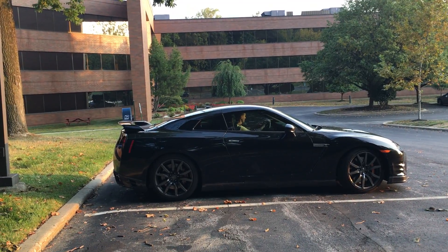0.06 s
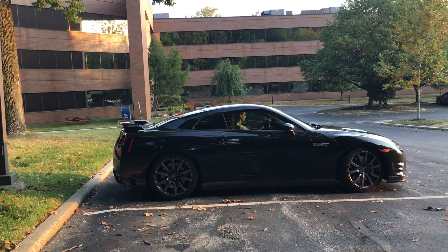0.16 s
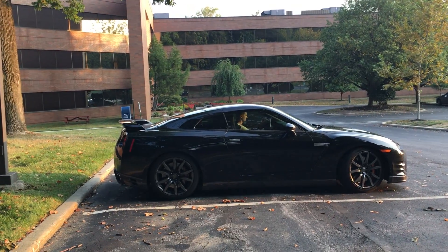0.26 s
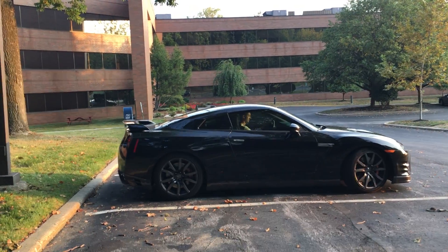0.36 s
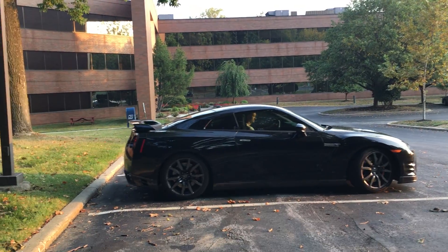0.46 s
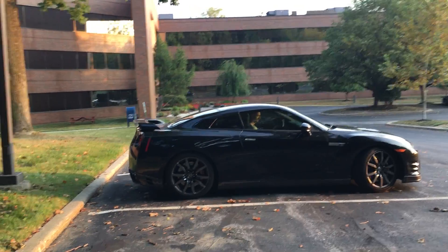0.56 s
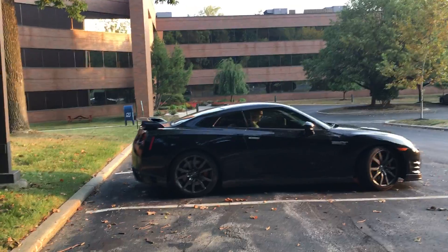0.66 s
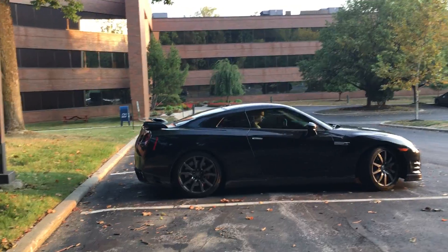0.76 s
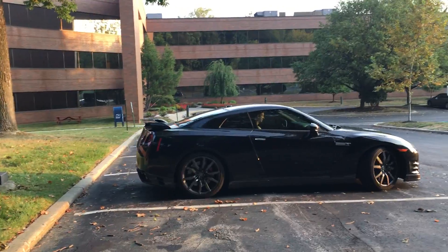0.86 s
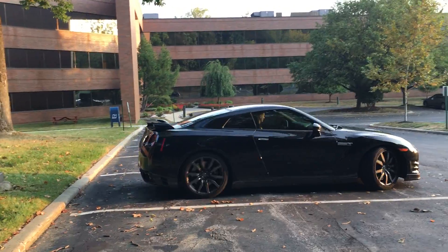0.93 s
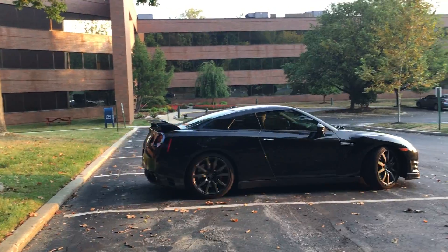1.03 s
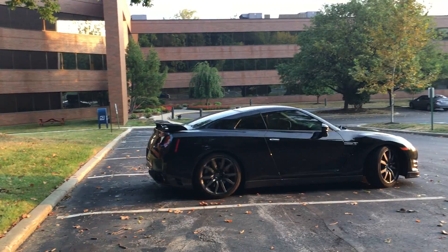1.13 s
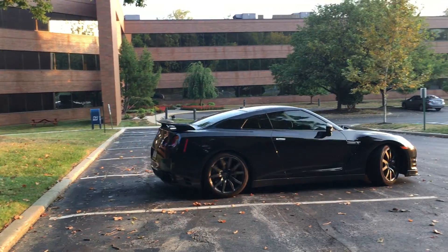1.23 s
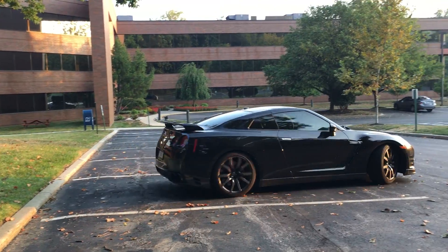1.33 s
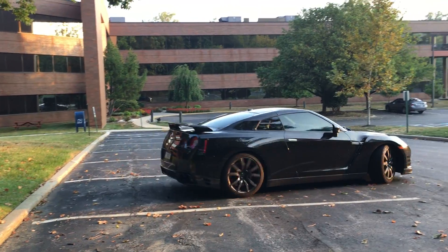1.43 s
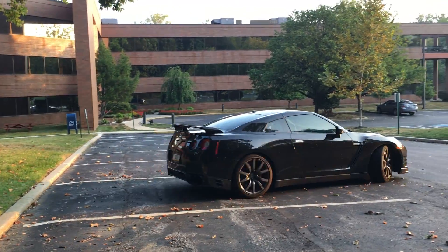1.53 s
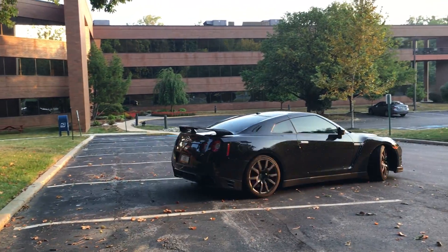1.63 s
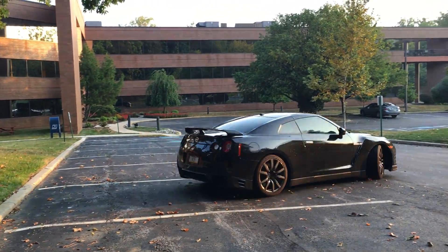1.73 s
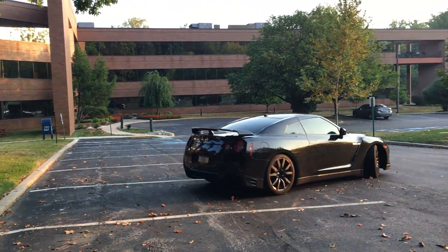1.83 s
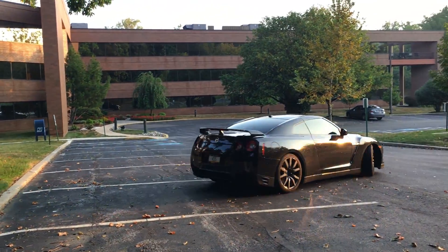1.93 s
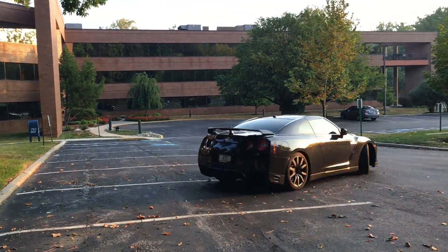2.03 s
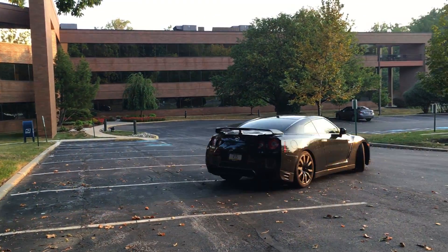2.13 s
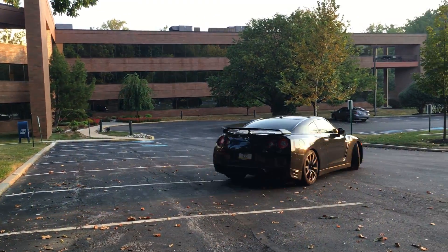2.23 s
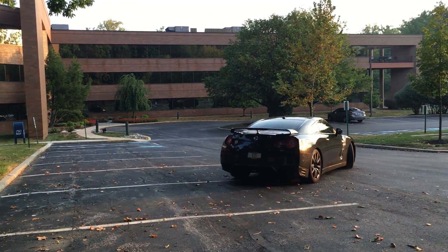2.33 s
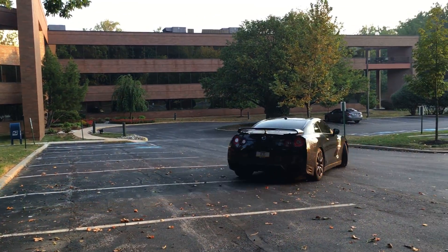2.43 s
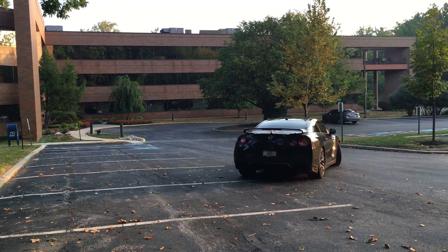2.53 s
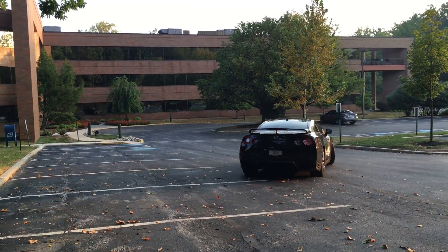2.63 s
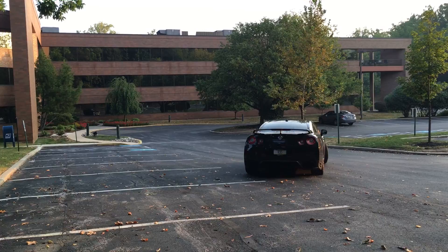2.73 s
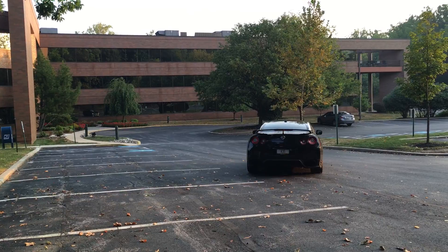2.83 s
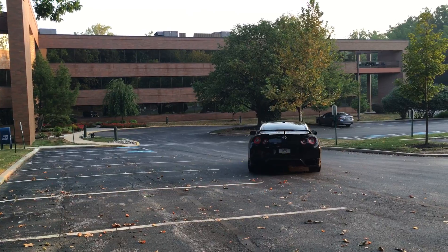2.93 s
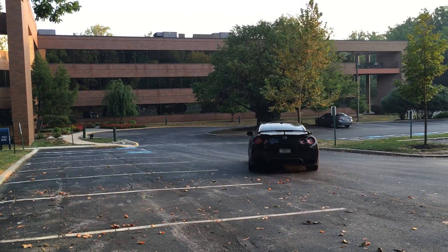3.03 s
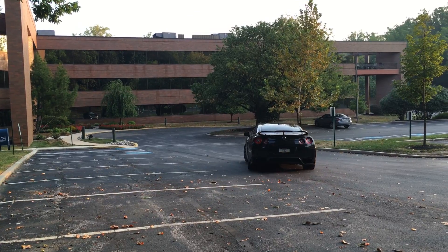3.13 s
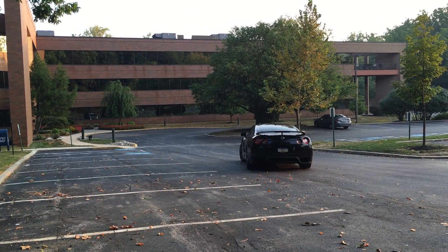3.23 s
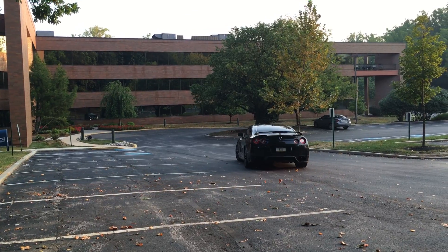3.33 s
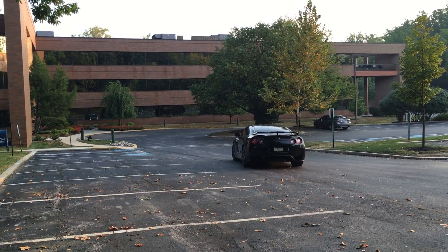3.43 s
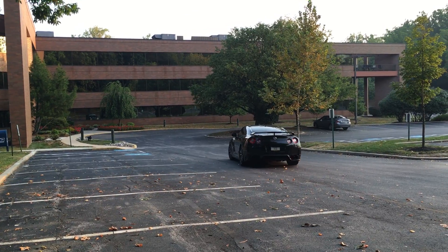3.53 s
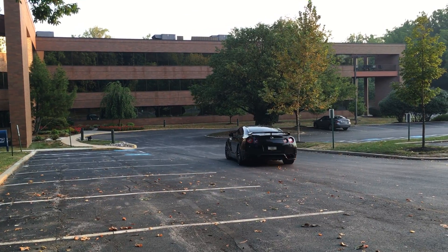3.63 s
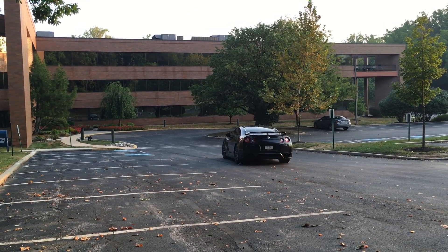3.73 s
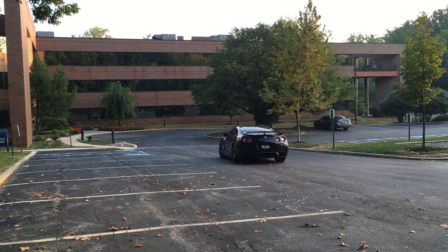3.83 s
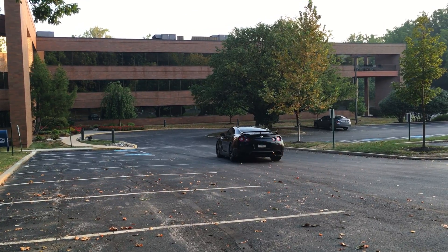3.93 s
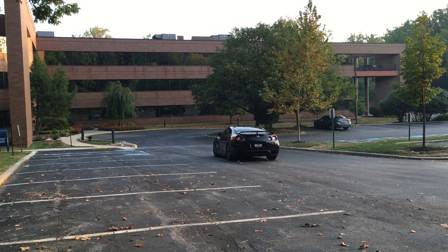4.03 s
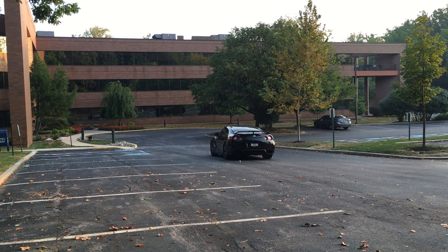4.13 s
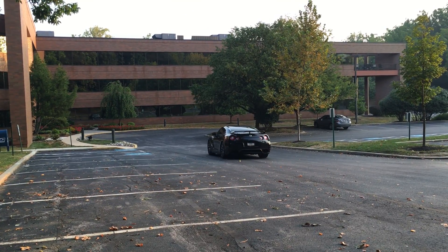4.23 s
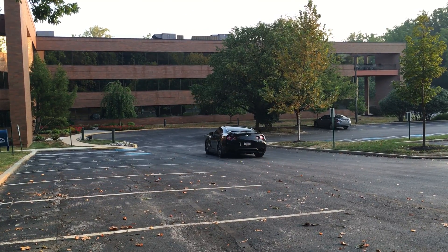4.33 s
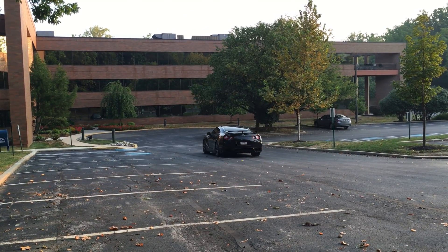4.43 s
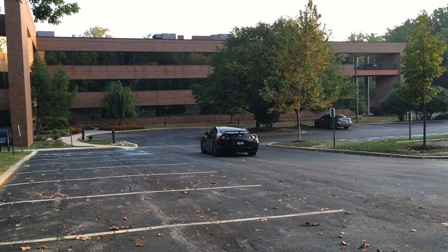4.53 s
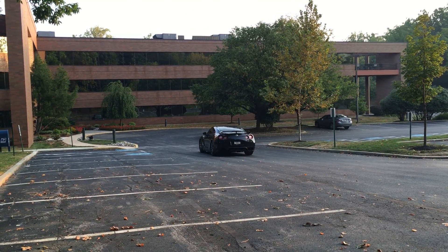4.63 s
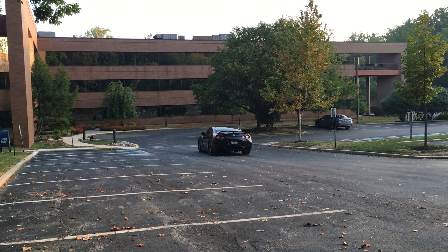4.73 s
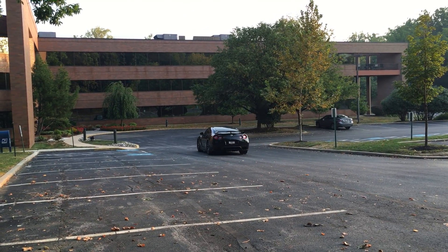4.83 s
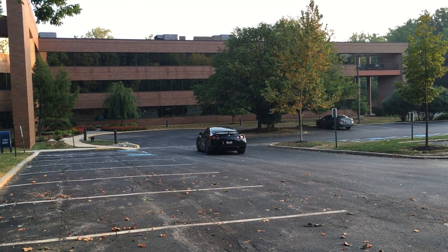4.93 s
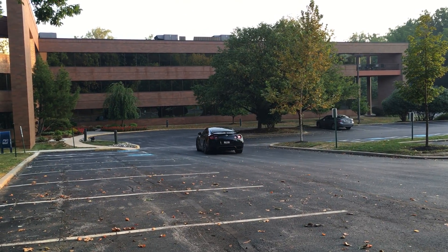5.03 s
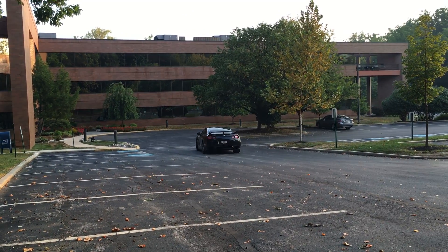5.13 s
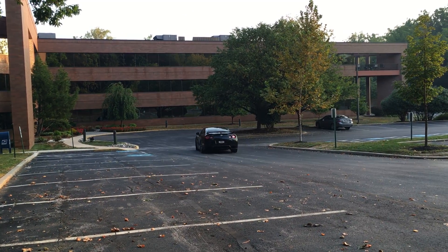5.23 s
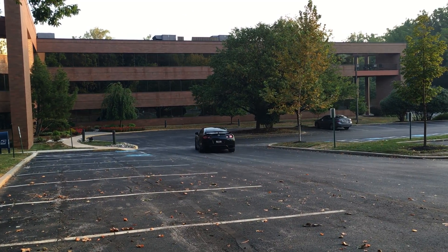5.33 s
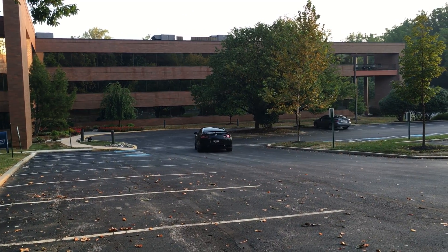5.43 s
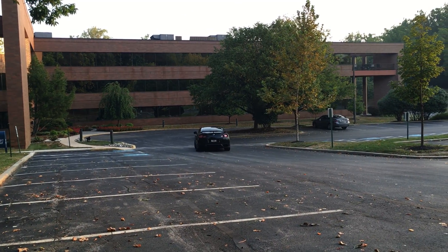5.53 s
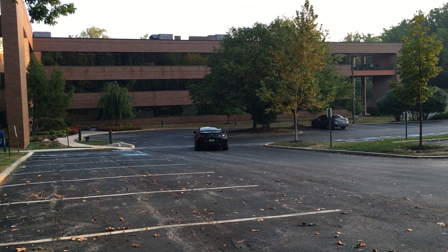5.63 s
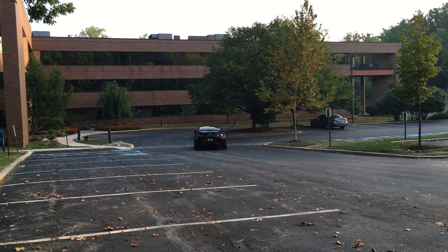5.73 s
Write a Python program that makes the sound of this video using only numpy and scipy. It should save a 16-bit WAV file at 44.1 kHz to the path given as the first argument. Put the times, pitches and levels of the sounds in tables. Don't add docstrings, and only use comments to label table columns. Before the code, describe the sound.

Low exhaust growl rises smoothly as a sports car turns and drives off over dry leaves, ending with soft pops amid evening insects.

```python
import sys
import numpy as np
from scipy import signal
from scipy.fft import rfft, irfft, next_fast_len
from scipy.io import wavfile
from scipy.ndimage import uniform_filter1d

SR = 44100
rng = np.random.default_rng(int(sys.argv[2]) if len(sys.argv) > 2 else 0)


def waveform_to_disk(signal):
    frames = np.transpose(np.atleast_2d(signal))
    scaled = np.clip(frames, -1, 1) * 32767
    samples = np.round(scaled).astype(np.int16)
    wavfile.write(sys.argv[1], SR, samples)


def gain_from_db(level_db):
    decades = np.asarray(level_db, float) / 20
    return 10 ** decades


N = 254456

CYLINDER_LEVELS = [0, -8, -6, -9, -16, -.5]
# time_s, share (0-1)
FLOW_SHARE = [(0, .4), (.4, .5), (1.9, .5), (2.15, .12), (3.5, .1), (3.8, .18), (4.7, .2), (5, .6),
              (5.3, .5), (5.4, .15), (5.77, .15)]
# frequency_hz, density_db (per Hz)
TYRE_SPECTRUM = [(3000, -26), (5000, -25), (8000, -2), (9800, -2.5), (10500, -8), (11800, -4.5),
                 (14000, -11.5), (16000, -10.5)]


def rms_one(x):
    return x / np.sqrt(np.mean(x ** 2) + 1e-20)


def in_time(rows):
    time_s, *columns = np.transpose(rows)
    return [np.interp(np.arange(N) / SR, time_s, column) for column in columns]


def drift(rate_hz):
    pole = np.exp(-2 * np.pi * rate_hz * 40 / SR)
    white = rng.standard_normal(N // 40 + 2002)
    slow = signal.lfilter([1], [1, -2 * pole, pole * pole], white)[2000:]
    return np.interp(np.arange(N) / 40, np.arange(len(slow)), rms_one(slow))


def resonate(x, modes):
    out = 0
    for k, (hz, width_hz, level_db) in enumerate(modes):
        r = np.exp(-np.pi * width_hz / SR)
        b = (1 - r * r) / 2 * np.array([1, 0, -1])
        a = [1, -2 * r * np.cos(2 * np.pi * hz / SR), r * r]
        out = out + (-1) ** k * gain_from_db(level_db) * signal.lfilter(b, a, x + 1e-18)
    return out


def coloured(spectrum):
    size = next_fast_len(N)
    hz, level_db = np.transpose(spectrum)
    bins_hz = np.arange(size // 2 + 1) * SR / size
    gain = gain_from_db(np.interp(np.log(bins_hz + 1), np.log(hz), level_db, -90, -90))
    return rms_one(irfft(rfft(rng.standard_normal(size)) * gain, size)[:N])


def evening():
    # frequency_hz, density_db (per Hz)
    air = [(180, -6), (300, -5), (404, -17.5), (674, -11.5), (744, -20.5), (2040, -14.5), (2210, -18.5),
           (3020, -28.5), (3400, -29.5), (4800, -36.5), (5760, -26.5), (6790, -32.5), (7620, -40),
           (11500, -50), (15500, -59)]
    # frequency_hz, width_hz, level_db
    low_chorus = [(1111, 180, 4.5), (1798, 53, 7), (2155, 44, 10), (2347, 100, 4), (3370, 112, -4)]
    # frequency_hz, width_hz, level_db
    high_chorus = [(5330, 280, -8.5), (5820, 360, -2), (6740, 240, 0), (6686, 130, -8), (7004, 64, -1.5)]
    low = rms_one(resonate(rng.standard_normal(N), low_chorus)) * gain_from_db(-52 + 0.5 * drift(7.6))
    high = resonate(resonate(rng.standard_normal(N), high_chorus), [(6480, 2800, 0)])
    settling_db = 6 * np.exp(-np.arange(N) / SR / 0.39)
    high = rms_one(high) * gain_from_db(-61 + 1.1 * drift(5) + settling_db)
    return gain_from_db(-46) * coloured(air) + low + high


def engine_bay():
    # frequency_hz, width_hz, level_db
    pulleys = [(1160, 35, -2), (1801, 51, -1.5)]
    turn_away_s = 1.4
    whistle = rms_one(resonate(resonate(rng.standard_normal(N), pulleys), pulleys))
    return whistle * gain_from_db(-54 + 3.4 * drift(14)) * np.exp(-np.arange(N) / SR / turn_away_s)


def steering_pump():
    # start_s, level_db, length_s
    wheezes = [(.25, -61, .4), (.735, -50, .06), (.81, -47, .09), (.92, -44, .06), (1, -46, .13),
               (1.15, -53, .16), (1.33, -49, .16), (1.5, -49, .34), (1.75, -55, .35)]
    level = np.zeros(N)
    for start_s, level_db, length_s in wheezes:
        length = round(length_s * SR)
        level[round(start_s * SR):][:length] += gain_from_db(level_db) * np.hanning(length)
    band = rms_one(resonate(rng.standard_normal(N), [(2150, 61, 0.02), (2300, 59, 0)]))
    return level * gain_from_db(-1.5 + 0.79 * drift(9.2)) * band


def clutch():
    # start_s, level_db, pitch_hz
    chirps = [(.168, -35, 690), (.17, -41, 1140), (0.206, -42, 1790), (.208, -51, 3320), (0.209, -60, 4000),
              (.245, -41, 1095), (0.275, -52, 3930), (.279, -60, 4270), (.36, -47, 2086), (.375, -50, 2150),
              (.28, -48, 1150), (.282, -35.5, 602), (0.302, -37, 1627), (.325, -47, 650), (.375, -50, 670)]
    out = np.zeros(N)
    t = np.arange(round(0.02 * SR)) / SR
    for start_s, level_db, hz in chirps:
        chirp = np.hanning(len(t)) * np.sin(2 * np.pi * hz * t * (1 + 0.24 * t))
        out[round(start_s * SR):][:len(t)] += gain_from_db(level_db) * chirp
    roughness = signal.lfilter([.02], [1, -1.9, .9025], rng.standard_normal(N))
    return out * (1 + .6 * roughness)


def dry_leaves(tyre_db):
    # start_s, peak_db, top_db (level above the crossover)
    snaps = [(1.3867, -52, -13), (1.6294, -48, -23), (1.6444, -48, -14), (1.7694, -55, -9),
             (1.9594, -55, -20), (2.1924, -45, -22), (2.4994, -49, -17), (2.7694, -53, -18),
             (3.0954, -56, -17), (3.2345, -54, -20), (3.3353, -55, -14), (3.4511, -50, -15),
             (3.5216, -49, -27), (3.7294, -51, -20), (4.0567, -52, -24)]
    decay_s, cracks_per_s, crossover_hz = 0.0045, 120, 10500
    out, crisp = 0, coloured(TYRE_SPECTRUM)
    for side, top_share in (("low", 0), ("high", 1)):
        crack_db = -72 + 3.5 * np.minimum(rng.exponential(1, N), 2)
        clicks = (rng.random(N) < cracks_per_s / SR) * gain_from_db(crack_db + tyre_db + 63.5)
        for start_s, peak_db, top_db in snaps:
            clicks[round(start_s * SR)] += gain_from_db(peak_db - 8 + top_share * (top_db + 12))
        burst = signal.lfilter([1], [1, -np.exp(-1 / (decay_s * SR))], clicks + 1e-18)
        band = signal.butter(4, crossover_hz, side, fs=SR, output="sos")
        out = out + burst * signal.sosfilt(band, crisp)
    return out


def tyre_hiss(tyre_db):
    return gain_from_db(tyre_db + 0.54 * drift(9)) * coloured(TYRE_SPECTRUM)


def body_hiss(idle, far_db):
    # frequency_hz, density_db (per Hz)
    body = [(700, 5), (1130, 4.5), (1400, 5), (1800, 3), (2200, -18), (2600, -4), (3400, -9.5),
            (4200, -13.5), (5500, -19)]
    body_db = -50 - 9 * idle + 0.56 * far_db
    return gain_from_db(body_db + 2.1 * drift(24)) * coloured(body)


def gear_whine(firing, throttle_db, coast, engaged):
    level_db = -57.5 + .5 * throttle_db - 11 * coast + drift(3)
    return engaged * np.sqrt(2) * gain_from_db(level_db) * np.cos(2 * np.pi * 17 * firing)


def exhaust_flow(idle, far_db, lift):
    # frequency_hz, density_db (per Hz)
    turbulence = [(25, -30), (45, -1.5), (65, 3), (120, 2.5), (200, -6.5), (280, -3.5), (350, -10),
                  (420, -18), (900, -19.5)]
    flow_db = -31 - 18 * idle + .7 * far_db + 3.5 * lift
    return gain_from_db(flow_db - 3 + drift(12)) * coloured(turbulence)


def fuel_burbles():
    # start_s, peak_db, brightness_db
    pops = [(5.043, -23, -22), (5.056, -25, -10), (5.087, -19, -20), (5.114, -21, -24), (5.134, -21, -22),
            (5.211, -19, -13), (5.25, -22, -20), (5.276, -24, -12), (5.466, -25, -16), (5.59, -27, -14),
            (5.654, -28, -14)]
    # frequency_hz, width_hz, level_db
    low_modes = [(62, 35, 3), (110, 70, 2), (175, 70, -6), (265, 60, -6)]
    start_s, peak_db, bright_db = np.transpose(pops)
    low, high = np.zeros((2, N))
    at = (start_s * SR).astype(int)
    low[at] = gain_from_db(peak_db + 41)
    high[at] = gain_from_db(peak_db + bright_db + 49)
    soft = signal.butter(2, 700, fs=SR, output="sos")
    return signal.sosfilt(soft, resonate(low, low_modes) + resonate(high, [(456, 14, 0)]))


def crank_rumble(firing, idle, far_db, lift):
    level_db = -46 - 14 * idle - .3 * far_db + 8.7 * lift
    return gain_from_db(level_db) * np.cos(np.pi * firing + 2.3 * drift(3.5))


def pipe_levels(speed, facing_db, slack_db, engaged):
    # frequency_hz, mean_db, swing_db, share of the facing gain (0-1)
    tuning = [(481.6, -38.5, 4, 1), (580.4, -44, 8.5, 0.67), (675.6, -41, 6, 0.51)]
    pulsed = np.clip(1.3 - 2 * in_time(FLOW_SHARE)[0], 0, 1)
    clean = np.clip(3.5 * engaged, 0, 1.25) * pulsed * np.clip(1 + facing_db / 18, 0, 1)
    levels = []
    for hz, mean_db, swing_db, share in tuning:
        swell_db = swing_db * clean * np.cos(2 * np.pi * hz / speed)
        levels.append(mean_db + slack_db + share * facing_db + swell_db)
    return levels


def rasp(firing, levels_db):
    lateness = [0, .14, .26, .22, .19, .04]
    # frequency_hz, width_hz, level_db
    pipes = [
        [(503, 81, 0)],
        [(591.8, 104, 0)],
        [(670, 37, 5.5), (759, 20, 0)],
    ]
    # frequency_hz, width_hz, level_db
    silencer = [(238.2, 16.6, 3), (315, 79, -26)]
    count = np.arange(np.ceil(firing[0]), firing[-1] - 1).astype(int)
    cylinder = count % 6
    at = np.searchsorted(firing, count + np.array(lateness)[cylinder])
    pulses = np.zeros(N)
    pulses[at] = gain_from_db(np.array(CYLINDER_LEVELS)[cylinder] + .8 * rng.standard_normal(len(count)))
    pulses = pulses + gain_from_db(-13) * np.roll(pulses, round(.0045 * SR))
    noisy, = in_time(FLOW_SHARE)
    drive = np.sqrt(1 - noisy ** 2) * rms_one(pulses) + noisy * rng.standard_normal(N)
    drive = signal.sosfilt(signal.butter(4, 880, fs=SR, output="sos"), drive)
    out = 0
    for modes, level_db in zip([*pipes, silencer], levels_db):
        first_hz, last_hz = modes[0][0], modes[-1][0]
        rung = resonate(resonate(drive, modes), [(first_hz, 130 + 1.5 * (last_hz - first_hz), 0)])
        rung = np.roll(rung, round((first_hz - 600) * SR / 80000))
        out = out + gain_from_db(level_db - 2.5) * rung / np.sqrt(uniform_filter1d(rung ** 2, SR // 4))
    return out


def order_levels(speed, throttle_db, facing_db, far_db, idle):
    # frequency_hz, width_hz, level_db
    resonances = [(62.2, 26, 3.5), (78.5, 29.6, 5.5), (165, 25, -8.5), (171.5, 64.3, -8.5),
                  (233.2, 22.6, -11), (258, 28, -11.5), (277.7, 28, -7), (321, 28, -21.5),
                  (388.4, 18.6, -26.5), (475, 13, -26), (604, 50, -24)]
    # level_db (at even throttle), share of the facing gain, idle_db (added at idle)
    orders = [(-18, -0.13, -8), (-12.5, .48, -3.5), (-10.5, 0.64, 11), (-14, -0.021, -1.5), (-13, 1, 27.5),
              (-19.5, 0.88, 1)]
    levels = []
    for k, (level_db, share, idle_db) in enumerate(orders):
        power = 0
        for hz, width_hz, db in resonances:
            detuning = 2 * ((k + 1) * speed - hz) / width_hz
            power = power + gain_from_db(db) ** 2 / (1 + detuning ** 2) ** 2
        wobble_db = 1.2 * min(k, 1) * drift(4.1)
        settings_db = throttle_db + share * facing_db + idle_db * idle + far_db
        levels.append(level_db + 10 * np.log10(power) + settings_db + wobble_db)
    return levels


def exhaust_note(firing, order_db, bank_db, lope):
    lags = [0, .12, .12, .03, 0, 0]
    # multiple of the firing rate, level_db
    half_orders = [(1.5, 0), (2.5, -5), (3.5, -8), (4.5, -14)]
    whole = np.arange(-600, 600)
    uneven = gain_from_db(np.array(CYLINDER_LEVELS))[whole % 6]
    strength = 1 + lope * np.interp(firing, whole, uneven - uneven.mean())
    strength = strength + .06 * np.interp(firing, whole, rng.standard_normal(len(whole)))
    note = banks = 0
    for k, (level_db, lag) in enumerate(zip(order_db, lags)):
        phase = 2 * np.pi * ((k + 1) * firing - lag) + .12 * k * drift(1.44)
        note = note + gain_from_db(level_db) * np.cos(phase)
    for order, level_db in half_orders:
        banks = banks + gain_from_db(level_db) * np.cos(2 * np.pi * order * firing + .4 * drift(1.5))
    return np.sqrt(2) * (strength * note + gain_from_db(bank_db) * banks)


def scene():
    # time_s, firing_rate_hz
    engine_speed = [(0, 39.2), (.17, 40.4), (.24, 44.4), (.4, 56.7), (.5, 58.4), (.84, 63.6), (1.12, 60.0),
                    (1.4, 63.6), (1.7, 65.4), (1.96, 65.0), (2.22, 78.2), (2.64, 85.5), (3.05, 95.2),
                    (3.5, 101), (4.1, 106.2), (4.66, 109.2), (4.8, 106.6), (5.1, 105.4), (5.77, 94)]
    # time_s, distance_m
    distance = [(0, 6.03), (2, 6.17), (3, 11.3), (4, 16.6), (5, 19), (5.77, 26.5)]
    # time_s, throttle_db, facing_db (tailpipes facing the listener)
    driving = [(0, -21.5, -21.5), (.2, -16, -8), (.35, -5.5, -11.5), (.5, -3.5, -16), (.74, -4.5, -10.5),
               (.84, -6, -6.5), (.98, -4.5, -10), (1.5, -4, -8), (2, -5.5, -3), (2.2, -9.5, 3.2),
               (2.5, -9, 1), (2.8, -1.8, 0.6), (3.1, 1, -0.5), (3.4, 4.5, -2.5), (3.7, 6.5, -10.5),
               (4.4, 4.5, -11), (4.9, 3.5, -17.5), (5.77, -0.5, -12)]
    # time_s, level_db
    fuel_cut = [(0, 0), (4.93, 0), (5.03, -16), (5.14, -16), (5.16, -7), (5.2, -14), (5.3, -14), (5.32, 0),
                (5.77, 0)]
    # time_s, gain_db
    microphone_gain = [(0, -1), (.3, 0.5), (.6, -3.5), (2, 0), (4, -1), (5.77, -1)]
    t = np.arange(N) / SR
    speed, = in_time(engine_speed)
    metres, = in_time(distance)
    throttle_db, facing_db = in_time(driving)
    firing = np.cumsum(speed) / SR
    firing = firing - firing[round(2.581 * SR)]
    far_db = -20 * np.log10(metres / metres[0])
    lift = np.interp(t, [4.44, 5.37, 5.37], [0, 1, 0])
    coast = np.clip((t - 4.05) / 0.49, 0, 1)
    idle = np.clip(1 - t / 0.35, 0, 1)
    engaged = np.clip(firing / 15 + 2, 0, 1)
    rolling = np.clip((t - 0.8) / (2.7 - 0.8), 0, 1)
    tyre_db = -68 + 8 * rolling + 1.16 * far_db

    lope = .22 + .13 * engaged * np.clip(-6 - throttle_db, 0, 6) * (1 - coast)
    bank_db = -41 + 1.06 * facing_db + 12 * lift
    order_db = order_levels(speed, throttle_db, facing_db, far_db, idle)
    note = exhaust_note(firing - .35, order_db, bank_db, lope)
    slack_db = -14 * idle - 1.7 * coast - 6 * lift
    silencer_db = -41 + 4 * idle + 1.1 * far_db
    rasp_db = pipe_levels(speed, facing_db, slack_db, engaged) + [silencer_db]
    exhaust = gain_from_db(in_time(fuel_cut)[0]) * note + rasp(firing, rasp_db) + fuel_burbles()
    exhaust = exhaust + crank_rumble(firing, idle, far_db, lift) + exhaust_flow(idle, far_db, lift)

    machinery = gear_whine(firing, throttle_db, coast, engaged) + clutch() + steering_pump() + engine_bay()
    rolling_noise = body_hiss(idle, far_db) + tyre_hiss(tyre_db) + dry_leaves(tyre_db)
    background = gain_from_db(in_time(microphone_gain)[0]) * evening()
    return (exhaust + machinery + rolling_noise + background)[None]


def band_limit(x):
    return signal.sosfilt(signal.butter(12, 15710, fs=SR, output="sos"), x)


def record(dry):
    faded = dry * np.clip(np.arange(N, 0, -1) / (.004 * SR), 0, 1)
    bass_cut = signal.butter(2, 35, "high", fs=SR, output="sos")
    return band_limit(signal.sosfilt(bass_cut, faded))


dry = scene()
out = record(dry)
waveform_to_disk(out)
```